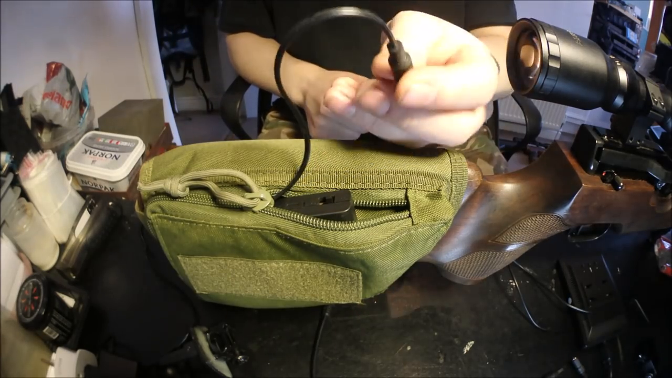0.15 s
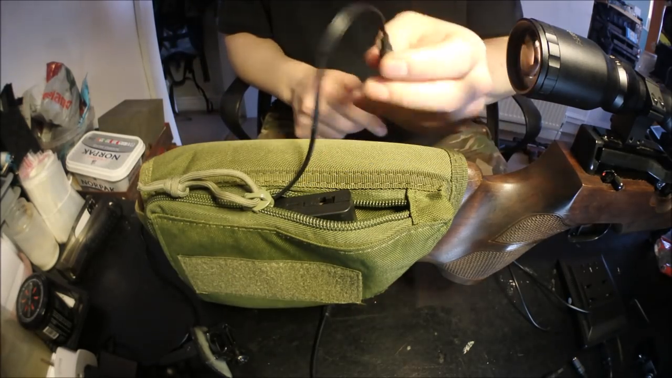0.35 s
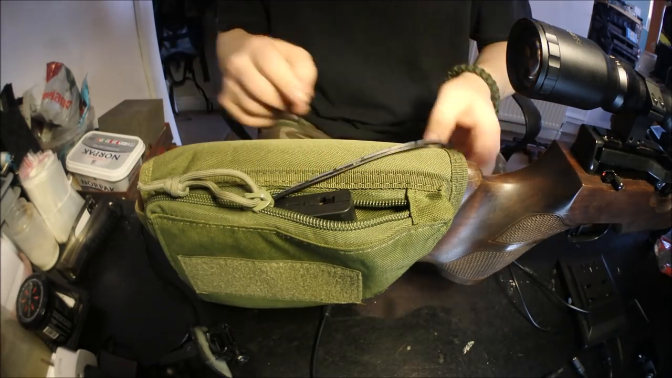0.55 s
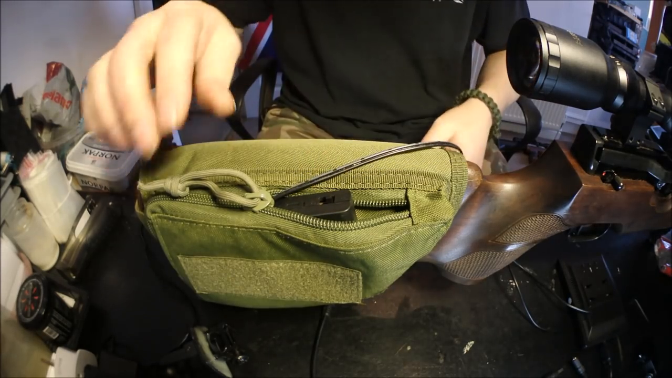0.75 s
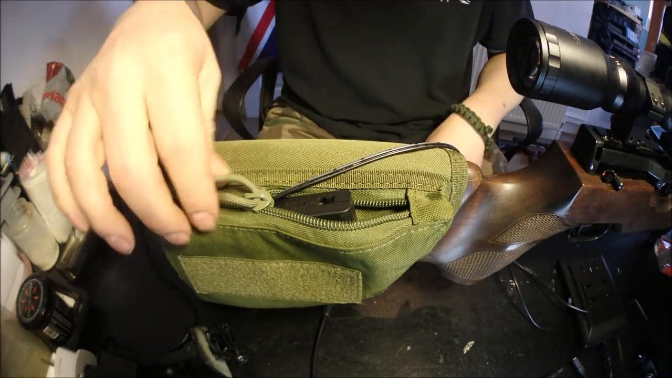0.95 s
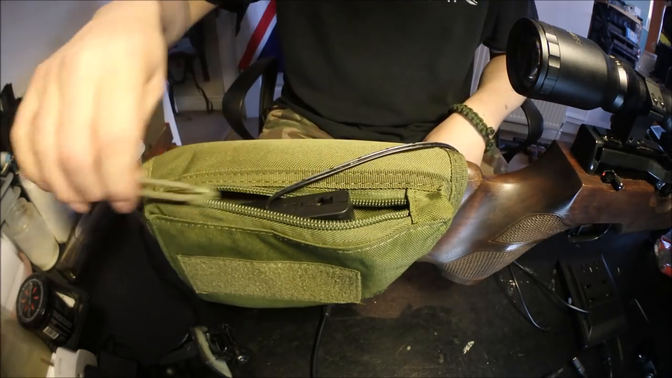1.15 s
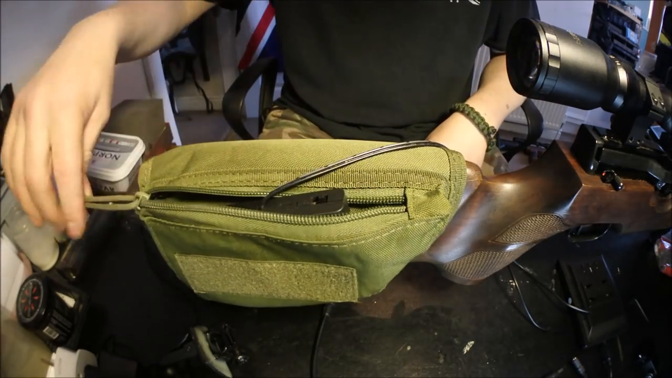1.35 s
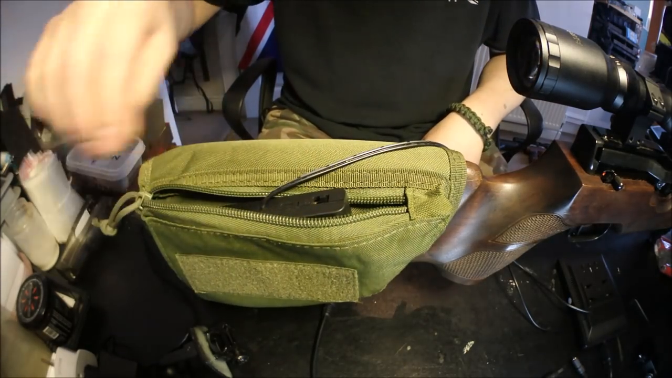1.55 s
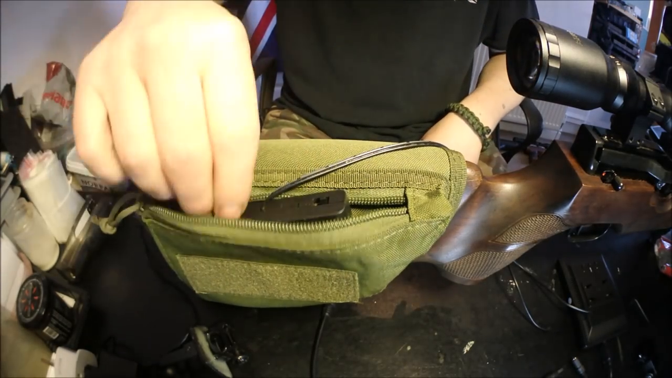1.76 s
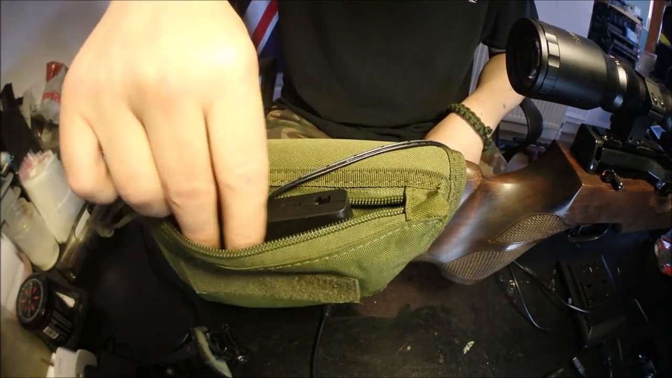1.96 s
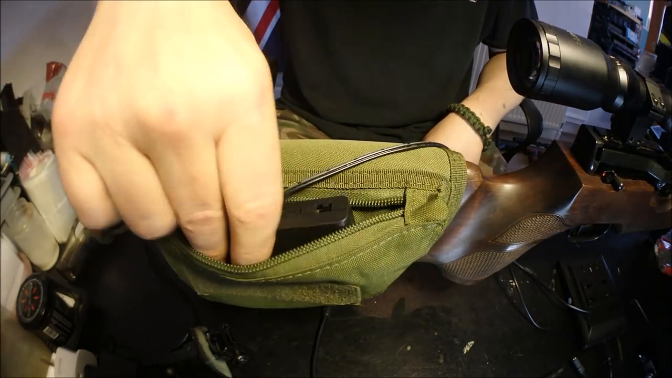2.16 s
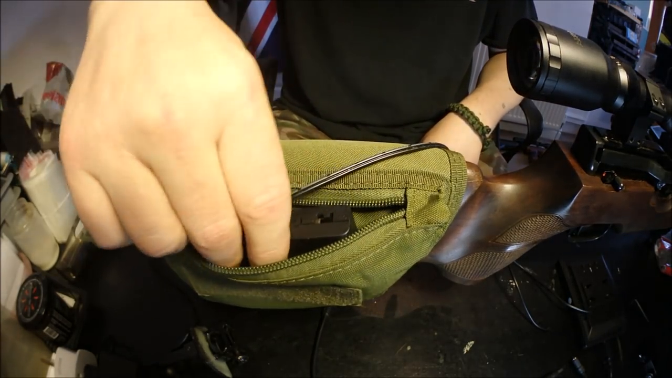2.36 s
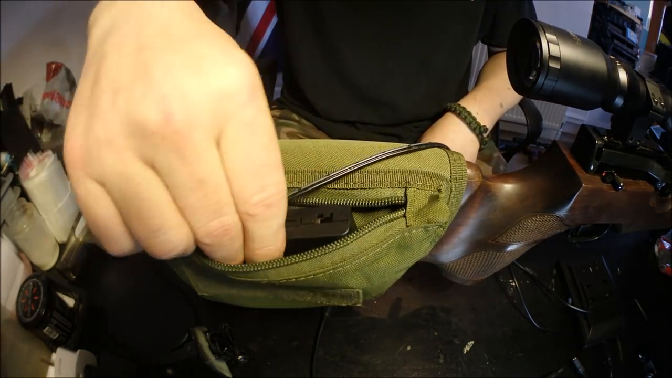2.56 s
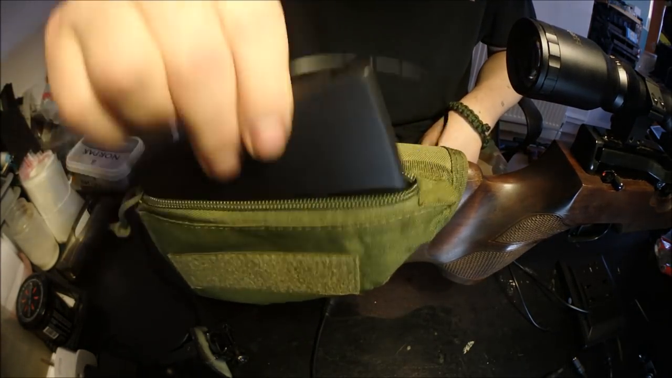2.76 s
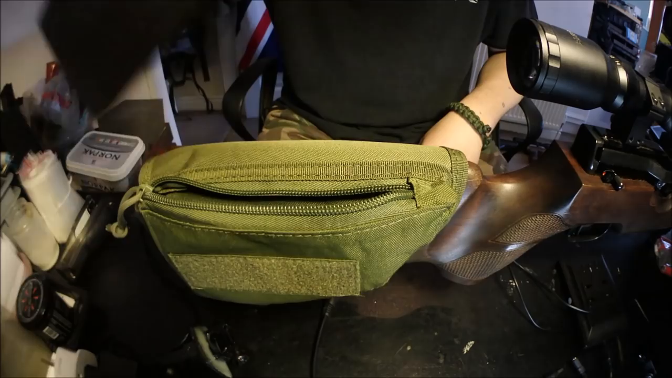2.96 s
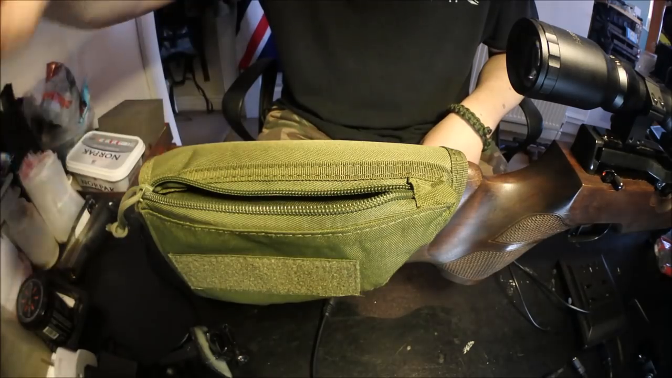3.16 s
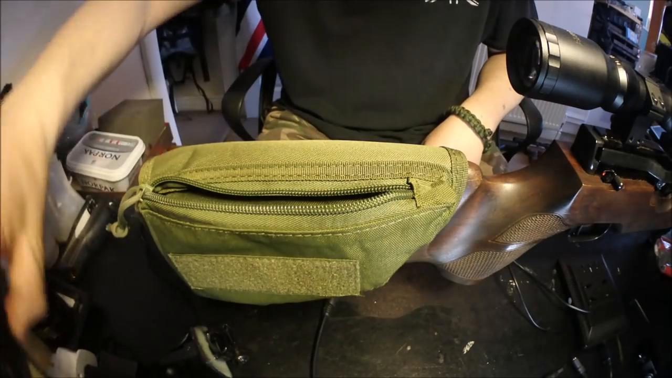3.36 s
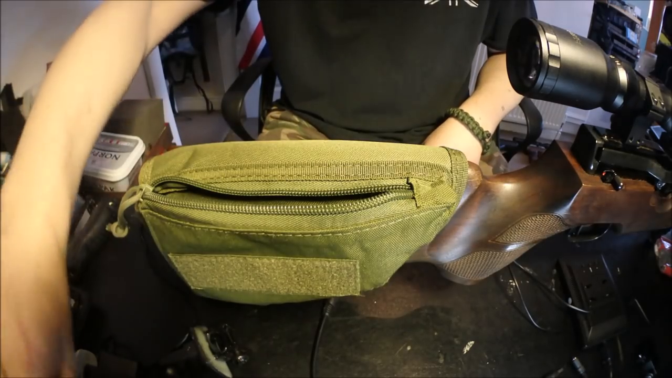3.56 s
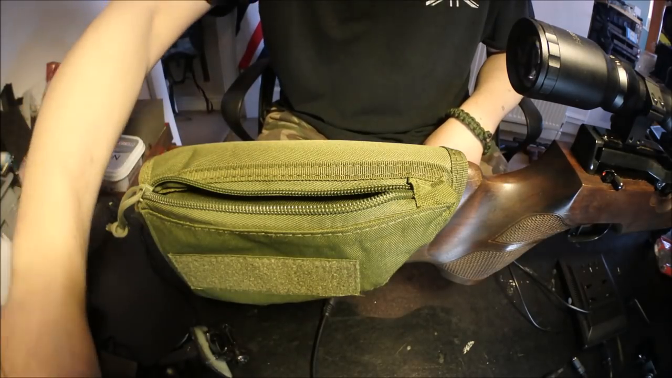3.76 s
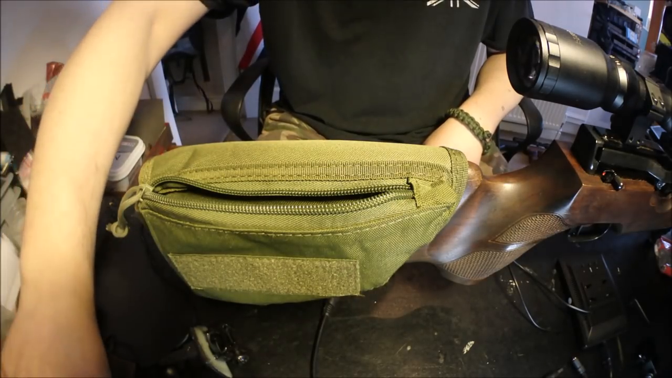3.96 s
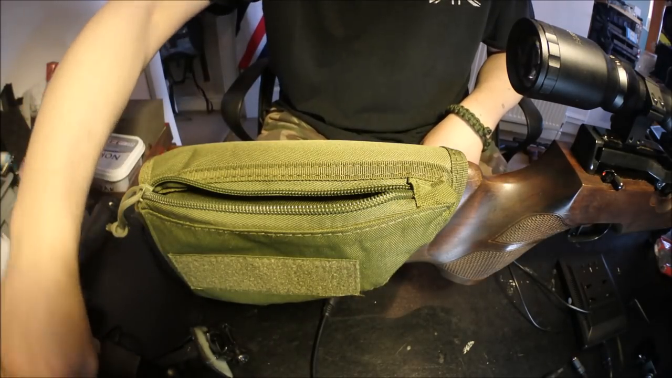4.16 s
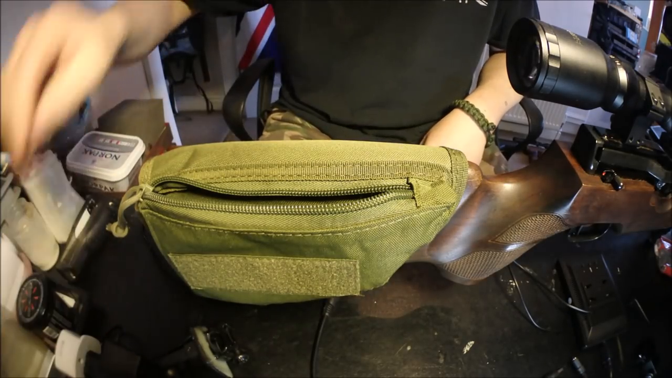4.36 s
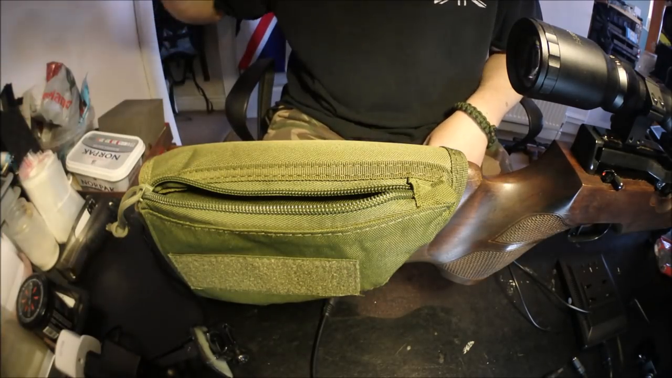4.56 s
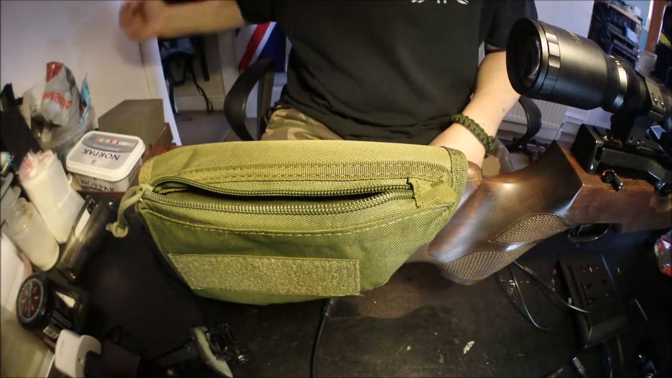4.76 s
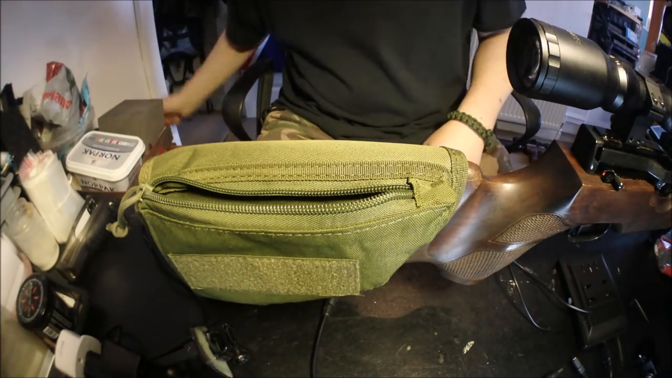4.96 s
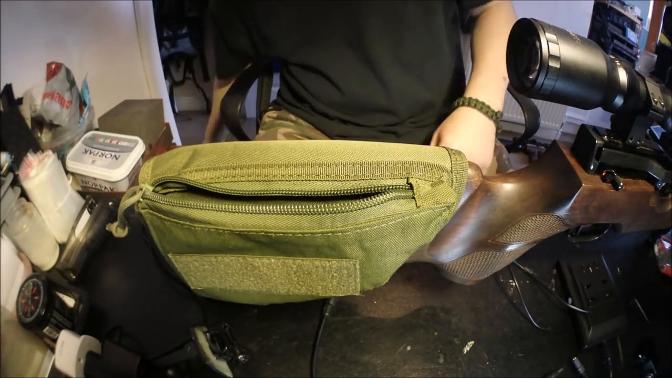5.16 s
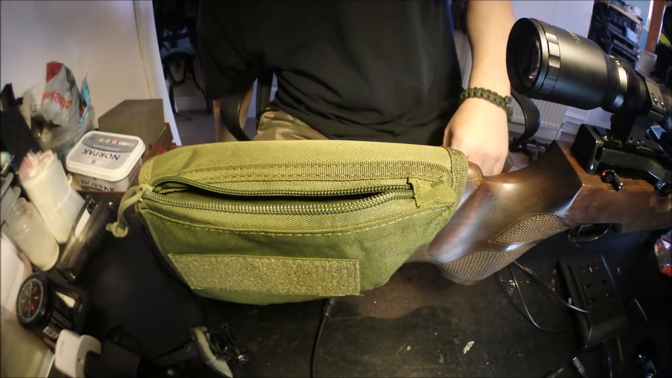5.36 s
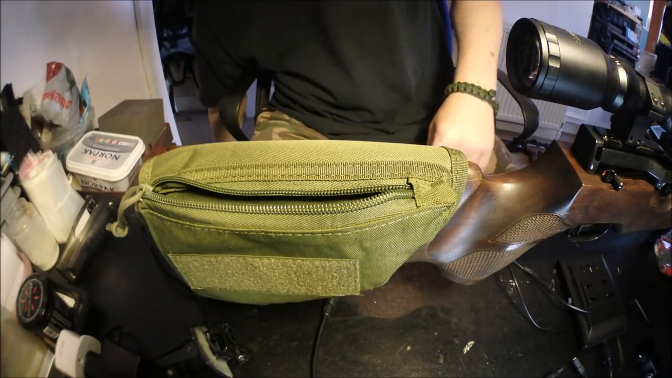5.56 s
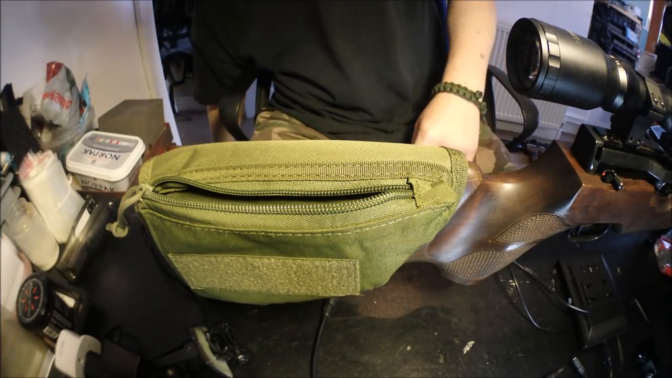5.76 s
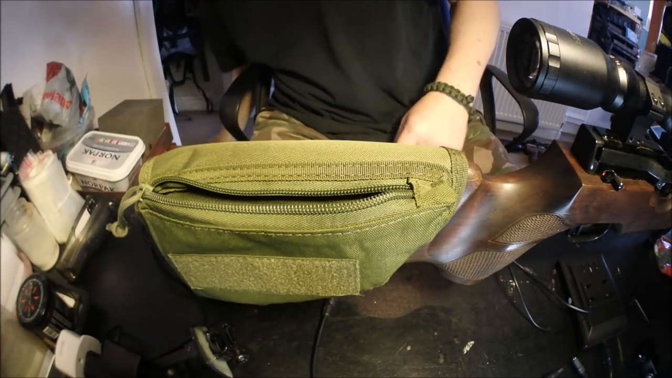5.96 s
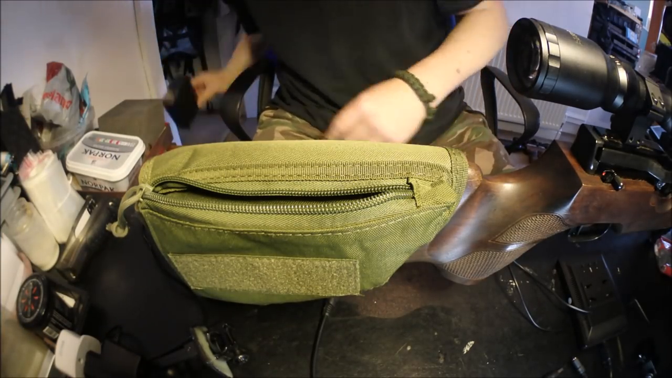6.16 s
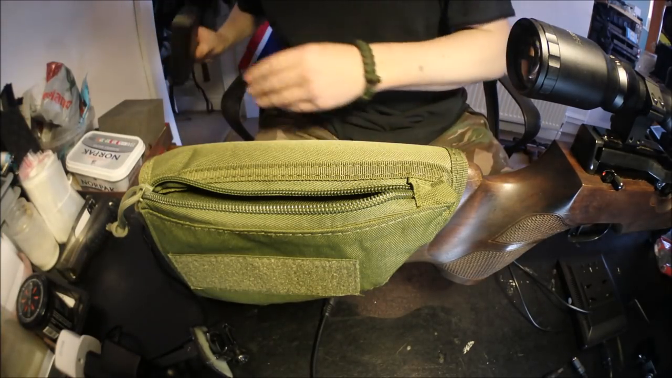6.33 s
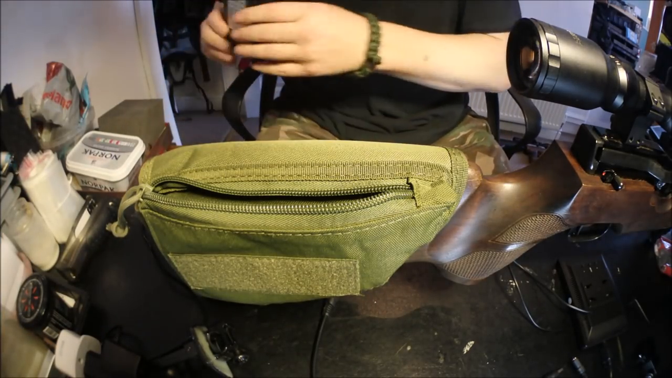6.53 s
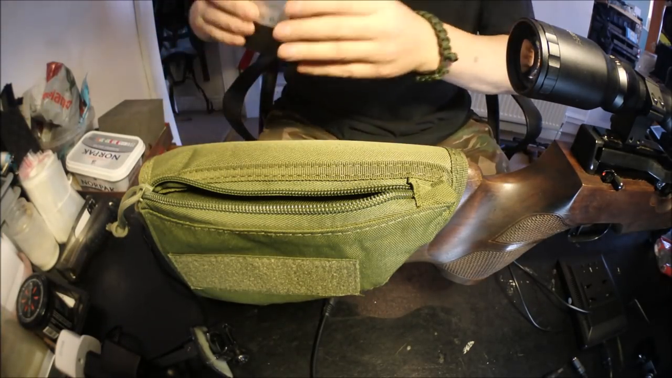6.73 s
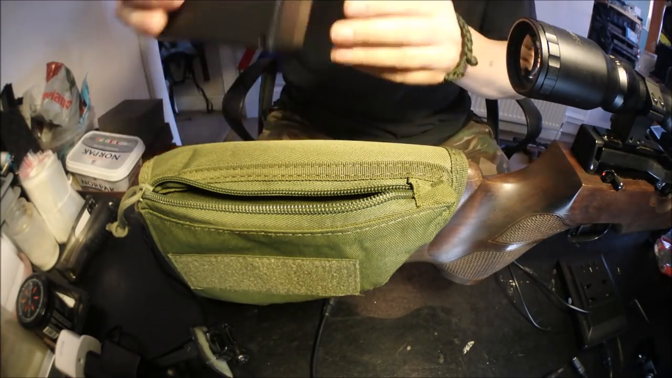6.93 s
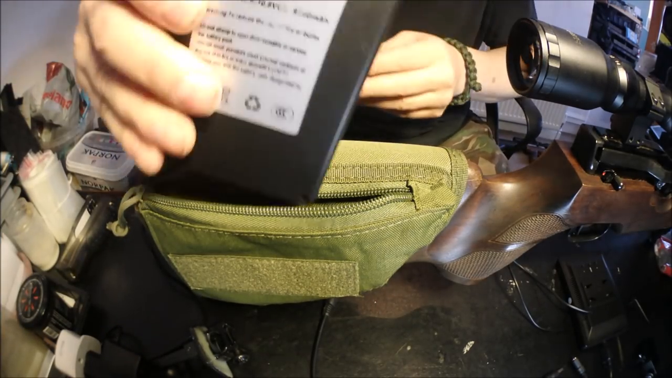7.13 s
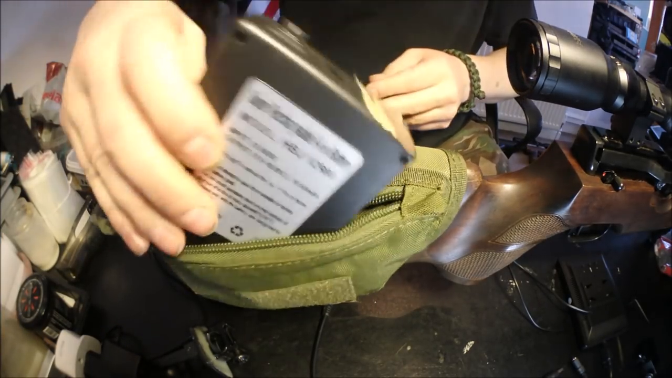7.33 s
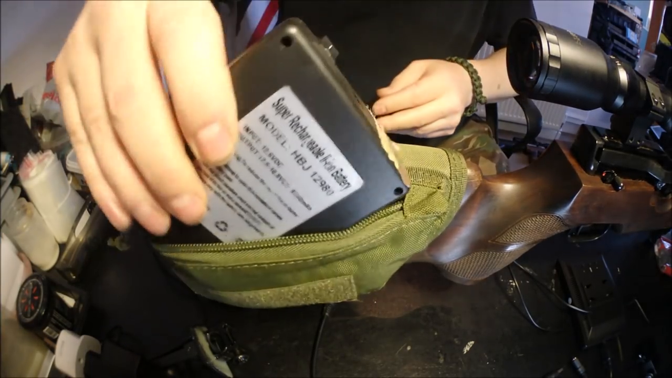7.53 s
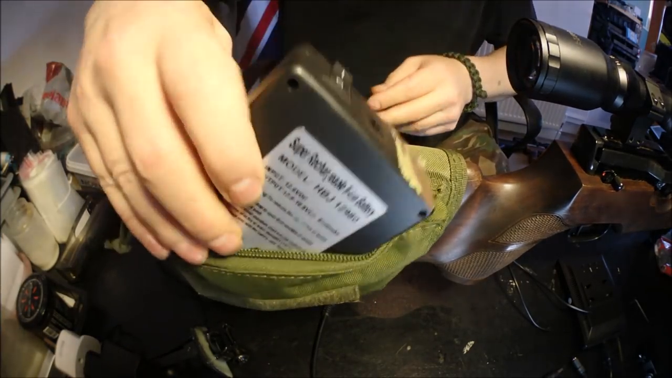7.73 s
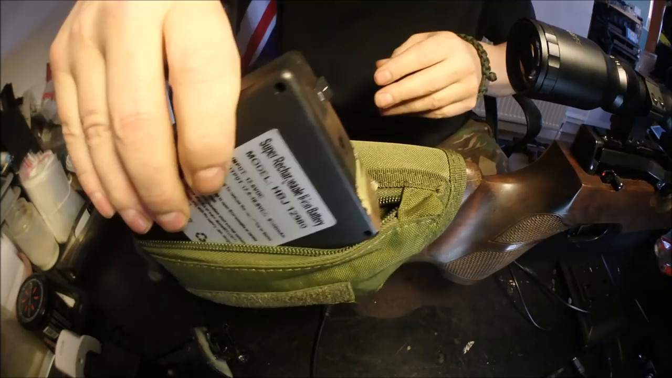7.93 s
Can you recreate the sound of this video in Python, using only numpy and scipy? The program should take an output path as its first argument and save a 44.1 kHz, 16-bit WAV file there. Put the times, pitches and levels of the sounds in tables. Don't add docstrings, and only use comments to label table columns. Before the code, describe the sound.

Close handling at a desk: cloth rustles, a short accelerating zip, plastic ticks, bright metal chinks, then a hollow box thump and firm scrapes.

```python
import sys
import numpy as np
from scipy import signal
from scipy.fft import rfft, irfft, next_fast_len
from scipy.io import wavfile
from scipy.ndimage import uniform_filter1d

SR = 44100
rng = np.random.default_rng(int(sys.argv[2]) if len(sys.argv) > 2 else 0)


def pcm_store(signal):
    levels = np.round(np.clip(np.atleast_2d(signal), -1, 1) * 32767)
    wavfile.write(sys.argv[1], SR, levels.astype(np.int16).T)


def natural_amplitude(level_db):
    exponent = np.asarray(level_db, float) / 20
    return 10 ** exponent


N = 352423

# (frequency [Hz], density [dB per Hz])
FINE_WEAVE = [(1760, -24.5), (3000, -5.5), (3290, -13), (3830, -6.5), (4260, -1.5), (5210, 4.5),
              (6380, -10.5), (9390, -12), (10700, -19.5), (13000, -39)]


def evened(x):
    return x / np.sqrt(np.mean(x ** 2) + 1e-20)


def peaked(x, db):
    return natural_amplitude(db) * x / abs(x).max()


def read(points, hz):
    f, value = np.transpose(points)
    return np.interp(np.log(hz + 1), np.log(f + 1), value)


def add(mix, s, sound):
    part = mix[..., round(s * SR):][..., :sound.shape[-1]]
    part += sound[..., :part.shape[-1]]


def add_pair(mix, s, sound, lag=0):
    lag = lag + 19 * (3.45 < s < 4.5)
    add(mix[0], s + lag / SR, sound)
    add(mix[1], s, sound)


def coloured(x, spectrum, causal=False):
    top_hz = 15800
    size = next_fast_len(x.shape[-1])
    gain = natural_amplitude(read(spectrum, np.fft.rfftfreq(size, 1 / SR)))
    if causal:
        log_gain = np.log(np.concatenate([gain, gain[-2:0:-1]]))
        gain = gain * np.exp(-1j * signal.hilbert(log_gain).imag[:len(gain)])
    gain[round(top_hz / SR * size):] = 0
    return evened(irfft(rfft(x, size) * gain, size)[..., :x.shape[-1]])


def paired(x, same):
    size = next_fast_len(N)
    a, b = rfft(x, size)
    likeness = np.clip(read(same, np.fft.rfftfreq(size, 1 / SR)), 0, 1)
    mid = np.sqrt((1 + likeness) / 2) * a
    side = np.sqrt((1 - likeness) / 2) * b
    return irfft(np.array([mid + side, mid - side]), size)[:, :N]


def resonate(x, hz, width):
    return signal.lfilter(*signal.iirpeak(hz, hz / width, SR), x)


def resonate_twice(x, hz, width):
    return resonate(resonate(x, hz, width), hz, width)


def drift(per_s):
    return evened(signal.sosfilt(signal.butter(2, per_s, fs=SR, output="sos"), rng.standard_normal(N)))


def ring(modes, start_s, upper=1, uneven_db=0, damp_s=1, struck=False):
    t = np.arange(SR // 3) / SR
    wobbles = rng.standard_normal((len(modes), len(t)))
    waver = natural_amplitude(uneven_db * np.array([evened(uniform_filter1d(w, 180)) for w in wobbles]))
    sound = np.zeros(len(t))
    for k, (hz, db, t60) in enumerate(modes):
        phase = rng.random() * (not struck)
        level = natural_amplitude(db - 60 * t / t60) * waver[k] * (upper if k > 4 else 1)
        sound += level * np.sin(2 * np.pi * (hz * t + phase))
    finger = natural_amplitude(-900 * np.maximum(t - damp_s, 0))
    return peaked(sound * (1 - np.exp(-t / max(start_s, 1e-4))) * finger, 0)


def ducking(t):
    # (time [s], depth [dB])
    ducks = [
        (2.97, 5.5),
        (3.509, 21.5),
        (3.94, 20),
        (4.189, 20),
        (7.23, 5.5),
    ]
    hold_s, creep_db_per_s, recover_db_per_s, attack_s = 0.26, 5.5, 11.5, 0.011
    drops = []
    for s, depth_db in ducks:
        since = np.maximum(t - s, 0)
        drop = depth_db * np.clip((t - s) / attack_s, 0, 1)
        drop = drop - creep_db_per_s * since - recover_db_per_s * np.maximum(since - hold_s, 0)
        drops.append(np.maximum(drop, 0))
    return -np.max(drops, axis=0)


def background():
    # (frequency [Hz], density [dB per Hz])
    hiss_spectrum = [(710, -26.5), (1200, -4), (1790, -6), (3030, -7.5), (3440, -12), (5130, -9),
                     (6500, -23), (8200, -16), (11500, -12), (14400, -11), (15700, -20.5)]
    # (frequency [Hz], density [dB per Hz])
    tone_spectrum = [(12, -38.5), (20, -9.5), (27, -10.5), (48, -16.5), (87, -3), (156, 1.5), (455, -5.5),
                     (505, -8), (663, -7.5), (1780, -22), (3000, -37), (3900, -65.5), (6600, -120)]
    # (frequency [Hz], left-right likeness [0-1])
    tone_same = [(60, 0.32), (240, 0.34), (950, 0.17), (3770, 0.006), (15000, 0.15)]
    # (time [s], level over the hiss [dB])
    stir = [(0, 12.5), (.55, 14.5), (1.0, 15), (1.8, 16), (2.25, 10.5), (2.98, 8), (3.3, 17), (3.5, 14),
            (3.7, 16), (3.9, 17.5), (4.34, 20.5), (4.6, 15.5), (5.5, 15.5), (6.7, 16), (7.1, 14), (7.3, 18),
            (7.99, 9.5)]
    # (time [s], level [dB])
    hum_levels = [
        (5.0, -105),
        (5.4, -71.5),
        (6.9, -66.5),
        (7.3, -63),
        (7.5, -83),
    ]
    hiss_db = -72
    t = np.arange(N) / SR
    hiss = coloured(rng.standard_normal((2, N)), hiss_spectrum) * natural_amplitude(9.0)
    tone = coloured(paired(rng.standard_normal((2, N)), tone_same), tone_spectrum)
    hum = evened(resonate(rng.standard_normal(N), 60, 8)) * natural_amplitude(np.interp(t, *np.transpose(hum_levels)))
    converter_spectrum = [(4500, 6.0), (6500, -2), (9000, 1.5), (15500, 0)]  # (frequency [Hz], density [dB per Hz])
    converter = natural_amplitude(-83.0) * coloured(rng.standard_normal((2, N)), converter_spectrum)
    rumble = signal.sosfiltfilt(signal.butter(2, 75, fs=SR, output="sos"), tone)
    stir_db = np.interp(t, *np.transpose(stir)) + 3.5 + 1.6 * drift(8.9)
    tone = (tone - rumble) * natural_amplitude(stir_db) + rumble * natural_amplitude(16.0)
    return (hiss + tone) * natural_amplitude(hiss_db + ducking(t)) + hum + converter


def room(x):
    # (frequency [Hz], t60 [s])
    decay = [(100, 0.21), (2000, 0.13), (6000, 0.11), (12000, 0.024)]
    taps = np.zeros((2, SR // 2))
    at = np.arange(100, SR // 2 - 20, 20) + rng.integers(0, 20, (2, (SR // 2 - 101) // 20))
    np.put_along_axis(taps, at, rng.choice([-1., 1.], at.shape), 1)
    hz, t, z = signal.stft(taps, SR, nperseg=256)
    tail = signal.istft(z * natural_amplitude(-60 * t / read(decay, hz)[:, None]), SR, nperseg=256)[1]
    return signal.fftconvolve(x[None], tail / np.linalg.norm(tail[0]), axes=1)[:, :N]


def patchy(x, depth_db):
    z = signal.stft(x, nperseg=256)[2]
    patches = uniform_filter1d(rng.standard_normal(z.shape[1:]), size=4, axis=0)
    patches = uniform_filter1d(patches, size=9, axis=1)
    return signal.istft(z * natural_amplitude(depth_db * evened(patches)), nperseg=256)[1][:, :N]


def cloth(snaps_per_s=4000, spread_db=1.4, flicker_db=1.3):
    # (time of most pressure [s], pressure [dB],
    # press-on [s], ease-off [s], fine over coarse [dB])
    rubs = [(.968, -49, 0.0037, 0.038, -10), (1.372, -42.5, 0.15, 0.067, 0.5),
            (1.402, -45, 0.0077, 0.055, -3.5), (1.44, -54, .05, 0.046, 4.5),
            (1.53, -60.5, .06, .02, 3), (1.912, -44.5, 0.024, 0.14, -5.5),
            (1.99, -43.5, 0.033, 0.059, -3), (2.08, -46, .006, 0.075, -8.5),
            (2.19, -57, 0.051, 0.07, -12), (2.275, -47.5, 0.065, 0.084, -9.5),
            (2.31, -51.5, .01, 0.081, -3), (2.357, -49.5, .01, 0.2, -5.5), (2.49, -56, .03, 0.11, -4),
            (2.568, -52, .06, 0.14, -5), (2.87, -48.5, 0.13, .09, -12.5),
            (7.272, -41, .008, 0.045, -4.5), (7.297, -48.5, .04, .01, -5),
            (7.338, -59, .004, .04, -7), (7.468, -39, 0.022, 0.048, -2), (7.51, -63, .05, 0.064, -3),
            (7.971, -31.5, 0.012, 0.045, 1.5), (7.99, -33, 0.03, .01, -3),
            (0.086, -40, 0.061, 0.087, -23.5), (0.363, -57.5, 0.048, 0.045, 3.5),
               (0.745, -35.5, 0.016, 0.027, -9), (3.27, -67, .03, 0.117, -22.5),
               (3.414, -56, 0.035, 0.0417, -29.5), (3.448, -49, 0.011, 0.018, -8.5),
               (3.508, -48.5, .001, 0.02, 16), (3.578, -44, 0.0012, 0.027, -9),
               (3.862, -45, 0.0065, 0.07, -6), (3.947, -46, 0.012, 0.061, 4),
               (4.049, -47.5, 0.029, 0.059, -7.5), (4.2, -50, 0.025, 0.096, -5),
               (4.28, -57, 0.1, 0.068, -19.5), (4.675, -63, .012, 0.068, -10),
               (4.727, -61.5, 0.0086, 0.1, -9), (5.329, -60, .006, 0.094, -3.5),
               (5.775, -50, 0.0049, 0.088, -5.5), (6.012, -73, 0.0043, 0.063, 15.5),
               (6.422, -54, 0.0091, 0.056, 7.5), (6.66, -47, 0.013, 0.15, -3),
               (6.79, -59, .008, 0.048, 8.5), (6.818, -51.5, 0.004, 0.057, -3),
               (6.909, -49.5, 0.052, 0.067, -5.5)]
    drags = [
        (.04, -46.5, 0.46, 0.0786, 9.5),
        (1.125, -58, 0.11, 0.077, 3),
        (2.12, -62, 0.061, 0.038, 10),
        (2.82, -42, 0.13, 0.24, -2),
        (2.95, -39.5, 0.047, 0.033, 1),
        (7.43, -41.5, 0.13, 0.11, -4.5),
        (7.61, -50, 0.093, 0.086, -0.5),
        (7.73, -35, 0.043, 0.059, -5),
        (7.888, -37.5, 0.081, 0.09, -6),
    ]
    # (frequency [Hz], density [dB per Hz])
    coarse_weave = [(150, -49.5), (250, -13), (377, -8.5), (530, -7.5), (885, -1), (1150, -5), (1230, -2),
                    (3800, -14), (4940, -49.5), (8360, -120)]
    # (frequency [Hz], left-right likeness [0-1])
    cloth_same = [(60, 0.64), (180, 1), (550, 1), (1650, 0.99), (4970, 0.25), (15000, 0.24)]
    uneven = natural_amplitude(spread_db * np.minimum(rng.exponential(1, N), 2.8))
    snaps = rng.standard_normal((2, N)) * (rng.random(N) < snaps_per_s / SR) * uneven
    grains = paired(evened(snaps) + 2.3 * rng.standard_normal((2, N)), cloth_same)
    grains = patchy(grains * natural_amplitude(flicker_db * drift(40)), depth_db=2.5)
    t, coarse, fine = np.arange(N) / SR, np.zeros(N), np.zeros(N)
    for rows, rounding in [(rubs, 0.89), (drags, 1.7)]:
        for s, pressure_db, on_s, off_s, fine_db in rows:
            on_s, off_s = np.clip([on_s, off_s], .001, .5)
            at = slice(max(round((s - 3 * on_s) * SR), 0), round((s + 3 * off_s) * SR))
            away = np.maximum((s - t[at]) / on_s, (t[at] - s) / off_s)
            power = natural_amplitude(pressure_db - 20 * away ** rounding) ** 2
            coarse[at] += power
            fine[at] += power * natural_amplitude(fine_db + 0.86) ** 2
    return coloured(grains, coarse_weave) * np.sqrt(coarse) + coloured(grains, FINE_WEAVE) * np.sqrt(fine)


def dull_knocks():
    # (time [s], peak [dB], frequency [Hz])
    knocks = [(0.096, -33.5, 728), (3.404, -40, 252), (3.506, -47, 212), (4.269, -38, 443),
              (5.78, -41, 284), (6.414, -33.5, 286), (6.427, -42, 336), (6.446, -39, 254),
              (6.822, -38, 238), (6.653, -32, 356), (6.676, -31.5, 206), (6.814, -35.5, 198),
              (7.463, -36.5, 243)]
    out = np.zeros(N)
    for s, db, hz in knocks:
        add(out, s, natural_amplitude(db) * ring([(hz, 0, .04), (1.3 * hz, -4, .03)], 0.0098, uneven_db=7.5))
    return out


def ticks():
    # (time [s], peak [dB], body [Hz], bright edge [dB])
    dull_ticks = [(.656, -34.5, 384, -11), (.726, -37.5, 620, -7), (1.192, -29, 1386, -2.5),
                  (1.3735, -17.5, 1000, -16), (1.971, -29.5, 980, 2.5), (1.984, -31.5, 960, 4.5),
                  (2.279, -38, 895.2, -4), (2.749, -36, 840, -2), (2.8815, -35, 850, -6.5),
                  (2.9005, -30, 894, -9), (3.942, -34, 1940, 14), (4.24, -32, 742.4, -9),
                  (4.247, -48, 1500, 13), (2.641, -44, 1600, -6), (3.216, -51, 1782, -10),
                  (6.016, -54, 718.7, 15), (6.654, -32.5, 1620, 1.5), (6.677, -40, 550, -14.5),
                  (6.729, -32, 1813, 3.5), (6.815, -37, 960, -4), (6.882, -41, 1740, 1),
                  (6.899, -37, 1600, -8), (6.913, -40.5, 775.8, 1)]
    plastic_ticks = [(.74, -28.5, 1280, -17), (.745, -38, 1330, -22.5), (.969, -38, 740, -12),
                     (1.196, -28, 680, -6), (1.212, -31.5, 744, -13), (1.881, -38.5, 874.8, 6),
                     (1.91, -27.5, 1190, 2), (1.948, -30, 1360, -12), (2.078, -35.5, 1490, -11),
                     (2.353, -36, 1010, 7), (2.555, -38.5, 666, -11), (2.674, -37, 830, -1.5),
                     (3.5075, -27, 940, 14), (4.727, -47.5, 630, -11.5), (5.782, -39.5, 600, 3.5),
                     (6.701, -41, 507, 7.5), (6.793, -41.5, 2090, 6), (7.228, -21, 1380, -4),
                     (7.297, -32, 1100, -3.5), (7.463, -19.5, 1190, -14), (7.972, -29, 1101, -11)]
    hard_ticks = [
        (2.846, -35, 1060, 13),
        (2.8585, -27.5, 1520, -9),
        (3.576, -40, 1200, 12),
        (3.603, -40, 1900, -12),
        (3.858, -37.5, 730, 4.5),
        (4.031, -39, 753, 5),
        (4.042, -47, 1930, 8),
        (4.051, -34, 850, -5),
        (4.188, -42.5, 703, 5),
    ]
    nail_catches = [(1.401, -31, 900, -6), (2.184, -42, 970, -12), (2.261, -41, 870, -6),
                    (2.305, -40, 810, -4), (2.356, -37, 895, 5), (2.485, -44, 1010, -7),
                    (7.272, -38, 900, 0), (7.336, -42, 800, -2), (7.603, -37, 842, -3),
                    (7.713, -31, 1120, 3), (7.846, -40, 1000, -2), (7.884, -27, 1960, -7)]
    # (ticks, thin shell [dB], t60 [s], shell [Hz])
    kinds = [(dull_ticks, -14.5, 0.016, 2700), (plastic_ticks, -2.5, 0.024, 2260),
             (hard_ticks, 4.4, 0.034, 2780), (nail_catches, -16.5, 0.014, 2400)]
    out, t = np.zeros((2, N)), np.arange(2048) / SR
    high = signal.butter(2, 3800, "high", fs=SR)
    for rows, shell_db, t60, kind_hz in kinds:
        fall = natural_amplitude(-60 * t / max(t60, .004)) * np.minimum(t / 0.00047, 1)
        for s, db, hz, bright_db in rows:
            noise = rng.standard_normal((3, len(t)))
            shell_hz = kind_hz * rng.uniform(0.82, 1.19)
            body = resonate_twice(noise[0] * fall, hz, 0.82 * hz)
            shell = resonate_twice(noise[1] * fall, shell_hz, 1700)
            fizz = signal.lfilter(*high, coloured(noise[2], FINE_WEAVE)) * fall ** 1.8
            click = 3.0 * (t == t[9])
            edge = fizz + natural_amplitude(-5.5) * resonate_twice(fizz + click, 5000, 1500)
            tick = peaked(body, db) + peaked(shell, db + shell_db) + peaked(edge, db + bright_db)
            add_pair(out, s, tick, lag=rng.integers(0, 4))
    return out


def pings():
    # (time [s], peak [dB], frequency [Hz], t60 [s])
    panel_pings = [(.656, -36, 630, 0.028), (0.658, -34.5, 1260, 0.011), (.656, -49, 2190, 0.0072),
                   (0.742, -28, 1260, 0.023), (0.745, -28, 1260, 0.022), (.746, -33.5, 646, 0.035),
                   (0.746, -33, 2990, 0.04), (0.968, -39.5, 3050, .016), (0.968, -42, 1630, .014),
                   (1.192, -28.5, 1290, 0.011), (1.374, -23.5, 1790, 0.024), (1.909, -31, 1040, 0.034),
                   (1.911, -40, 1550, 0.02299), (1.91, -29.5, 2340, 0.021), (1.91, -32.5, 3680, 0.024),
                   (1.909, -35, 8400, 0.0065), (1.985, -35.5, 920, 0.049), (1.994, -38, 4860, 0.011),
                   (1.995, -38, 3050, 0.01), (1.994, -41, 1400, 0.011), (2.354, -40, 2550, 0.026),
                   (2.749, -31, 5000, 0.012), (2.8462, -16.5, 4670, 0.0079), (2.847, -28, 1050, 0.02),
                   (2.848, -24, 2940, 0.016), (2.856, -27.5, 2400, 0.00697), (2.859, -17.5, 3160, 0.0072),
                   (2.859, -23, 2590, 0.022), (2.868, -29.5, 1450, 0.023), (2.869, -32, 2970, 0.017),
                   (2.8814, -29.5, 4900, 0.0056), (2.8815, -25.5, 799, 0.016), (2.901, -26, 950, 0.018),
                   (3.5075, -21.5, 5000, 0.012), (3.5087, -29, 4530, 0.011), (3.508, -30, 2325, .02),
                   (3.5077, -32.5, 300, 0.007), (3.507, -32, 1250, .01), (3.5084, -18, 5400, 0.017),
                   (3.5085, -26, 5900, 0.013), (3.5087, -28.5, 7750, .012), (3.576, -28, 3920, 0.022),
                   (3.6033, -38, 4980, 0.015), (3.859, -37.5, 755, 0.065), (4.042, -31.5, 3840, 0.027),
                   (4.042, -39.5, 4840, 0.027), (4.042, -40.5, 1880, 0.028), (4.051, -37, 3100, .03),
                   (4.24, -31.5, 725, 0.042), (6.012, -54, 7360, 0.022), (7.229, -38, 7470, 0.011),
                   (7.4627, -23.5, 1065, 0.031), (7.4627, -23.5, 1830, 0.021), (7.464, -26, 2660, 0.017),
                   (7.972, -27.5, 1120, 0.026),
                   (5.783, -39, 4900, 0.025), (5.783, -46, 1860, 0.034), (6.654, -39.5, 1360, 0.022),
                  (6.654, -38, 2100, 0.022), (6.815, -32.5, 964, 0.022), (6.815, -39, 1780, 0.025),
                  (6.883, -41.5, 1720, .03), (6.9, -40, 1700, .025), (6.913, -38.5, 720, 0.024),
                  (6.913, -40, 1690, .025), (6.794, -43, 5130, 0.011), (1.227, -38, 750, .04)]
    start_s = 0.00029
    out, t = np.zeros((2, N)), np.arange(2048) / SR
    for s, db, hz, t60 in panel_pings:
        envelope = natural_amplitude(-60 * t / max(t60, .004)) * (1 - np.exp(-t / start_s))
        add_pair(out, s, peaked(envelope * np.sin(2 * np.pi * hz * t), db))
    return out


def zipper(jitter=0.015):
    # (time [s], tooth rate [teeth per s])
    slider = [
        (1.2, 73),
        (1.232, 78.4),
        (1.268, 144),
        (1.286, 185),
        (1.308, 221),
        (1.322, 258),
        (1.352, 349),
        (1.376, 415),
        (1.401, 370),
    ]
    # (frequency [Hz], density [dB per Hz])
    pouch_body = [(100, -50), (500, -26), (900, -10), (1200, 0), (1500, -3), (2200, -8), (4000, -35)]
    # (frequency [Hz], density [dB per Hz])
    tape_fizz = [(300, -25.5), (700, -4.5), (1400, -1), (1900, -2.5), (3000, -7.5), (5100, -6),
                 (6300, -23.5), (9000, -23.5), (12000, -42)]
    # (multiple of the tooth rate, level [dB])
    whirr_tones = [(1, -1), (2, 1), (3, 0), (4, -3), (5, -6), (6, -9), (7, -12)]
    # (frequency [Hz], gain [dB])
    whirr_body = [(190, -24), (245, 5), (500, -3.5), (800, 5.5), (1100, 2), (1600, -9.5), (2200, -5),
                  (3000, -15)]
    stop_s, stop_db_per_s = 1.374, 896
    flap_hz, flap_width_hz = 745, 163

    s, speed = np.transpose(slider)
    t = np.arange(s[0], s[-1], 1 / SR)
    teeth_per_s = np.interp(t, s, speed)
    octaves = np.log2(teeth_per_s / 100)
    stop_db = stop_db_per_s * np.maximum(t - stop_s, 0)

    def pull_gain(db, db_per_octave):
        return natural_amplitude(db + db_per_octave * octaves - stop_db)

    turns = np.cumsum(teeth_per_s * (1 + jitter * drift(60)[-len(t):])) / SR
    clicks = np.diff(np.floor(turns), prepend=0) * natural_amplitude(0.99 * rng.standard_normal(len(t))) / np.sqrt(teeth_per_s)
    puffs = (0.45 + np.exp(-(turns % 1) / 0.41)) * rng.standard_normal(len(t))
    flap = evened(resonate(resonate(clicks, flap_hz, flap_width_hz), flap_hz, 3.9 * flap_width_hz))
    whirr = np.zeros(len(t))
    for k, db in whirr_tones:
        whirr += natural_amplitude(db + read(whirr_body, k * teeth_per_s)) * np.cos(2 * np.pi * (k * turns + k * k / 7))
    sound = pull_gain(-58.5, 7.5) * coloured(-clicks, pouch_body, causal=True)
    sound += pull_gain(-47, 6.5) * coloured(puffs, tape_fizz)
    sound += pull_gain(-45, -3) * flap + pull_gain(-54, 10) * whirr
    out = np.zeros(N)
    add(out, s[0], sound * signal.windows.tukey(len(t), .08))
    return out


def snaps():
    # (time [s], peak [dB])
    hard_snaps = [
        (2.846, -30.5),
        (3.5067, -15.5),
    ]
    out, t = np.zeros((2, N)), np.arange(2048) / SR
    for s, db in hard_snaps:
        crack = rng.standard_normal(len(t)) * natural_amplitude(-60 * t / 0.0085)
        add_pair(out, s, peaked(resonate_twice(crack, 14000, 5000), db))
    return out


def desk_blow():
    # (time [s], peak [dB])
    blow = [
        (3.576, -33),
    ]
    # (frequency [Hz], level [dB], t60 [s])
    desk_modes = [(150, -6.5, 0.14), (182.5, -0.5, 0.114), (396, -8.5, 0.091), (547, -16, 0.08)]
    out = np.zeros(N)
    for s, db in blow:
        add(out, s, natural_amplitude(db) * ring(desk_modes, 0.00075, uneven_db=3.0, damp_s=0.054))
    return out * np.array([[5.2], [-3.2]])


def metal_part():
    # (time [s], peak [dB])
    clasp_taps = [
        (3.8584, -33.5),
        (3.896, -34),
    ]
    # (frequency [Hz], level [dB], t60 [s])
    clasp_modes = [(3150, -4.5, 0.17), (3830, -5, 0.14), (5006, 4.5, 0.071), (5367, -11, 0.12),
                   (6078, -7, 0.14), (8640, -28, 0.0995), (9620, -30.5, 0.094), (10300, -27.5, .1)]
    # (time [s], peak [dB], softness of start [s], share of upper modes, time until damped [s])
    chinks = [
        (3.934, -38.5, 0.0014, 0.36, .09),
        (3.9422, -23, 0.0031, 1.9, 0.079),
        (4.19, -31, 0.0013, 1.5, 0.14),
        (4.208, -38.5, 0.00152, 0.54, 0.1),
    ]
    # (frequency [Hz], level [dB], t60 [s])
    part_modes = [(2498, -2, .12), (3092, -6, .25), (4016, -14, .095), (4848, -6, .3), (4963, -1, .12),
                  (5324, -8, .22), (5873, -10, .14), (6385, -6, .075), (7693, -10, .08), (8802, -5, .078),
                  (9625, -24, .12), (10560, -8, .1), (13720, -30, .11)]
    edge_modes = [(2490, -1, .11), (3092, -9, .38), (4759, -16, .12), (4845, 0, .25), (4963, -10, .2),
                  (3700, -20, .05), (5290, -13, .12), (6056, -21, .1), (7500, -15, .04), (8300, -9, .07),
                  (8700, -13, .1), (10520, -4, .09), (10850, -14, .12), (12950, -24, .08)]
    edge_from_s = 4.1
    out = np.zeros((2, N))
    for s, db in clasp_taps:
        add_pair(out, s, natural_amplitude(db) * ring(clasp_modes, 0.001197, uneven_db=2.0))
    for s, db, start_s, upper, damp_s in chinks:
        modes = part_modes if s < edge_from_s else edge_modes
        add_pair(out, s, natural_amplitude(db) * ring(modes, start_s, upper, uneven_db=0.5, damp_s=damp_s))
    return out


def creak():
    # (frequency [Hz], level [dB], t60 [s])
    blip = [
        (4.41, -59),
        (765, 0, .2),
    ]
    s, db = blip[0]
    out = np.zeros(N)
    add(out, s, natural_amplitude(db) * ring(blip[1:], 0.01085, uneven_db=2.5, damp_s=0.029))
    return out


def box_blow():
    # (time [s], peak [dB])
    blow = [
        (7.2284, -7),
    ]
    # (frequency [Hz], level [dB], t60 [s])
    box_modes = [(106, -21.5, 0.47), (162, -21, 0.13), (292, -4, 0.049), (342, 4, 0.029),
                 (595, -1.5, 0.033), (740, 2.5, 0.019), (1000, -3.5, 0.03), (1310, -4.5, 0.024),
                 (1600, -3, 0.017), (2070, -8, 0.014)]
    left_db = -2
    out = np.zeros(N)
    for s, db in blow:
        add(out, s, natural_amplitude(db) * ring(box_modes, 0.00065, uneven_db=2.0, struck=True))
    return out * natural_amplitude(np.array([[left_db], [0]]))


def scene():
    room_db, left_db, low_cut_hz = -12.5, 0.83, 90
    near = cloth() + dull_knocks() + ticks() + pings() + zipper() + snaps()
    near = near + desk_blow() + metal_part() + creak() + box_blow()
    near = signal.lfilter(*signal.butter(2, low_cut_hz, "high", fs=SR), near)
    mix = near + natural_amplitude(room_db) * room(near.mean(0)) + background()
    return mix * natural_amplitude(np.array([[left_db], [-left_db]]))


def roll_off(x):
    return signal.sosfilt(signal.butter(12, 16580, fs=SR, output="sos"), x)


def record(dry):
    mix = signal.oaconvolve(dry, signal.firwin(255, 16500, fs=SR)[None], "same")
    return roll_off(mix)


dry = scene()
out = record(dry)
pcm_store(out)
```